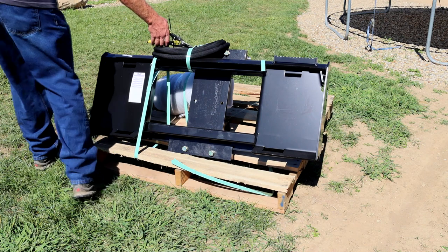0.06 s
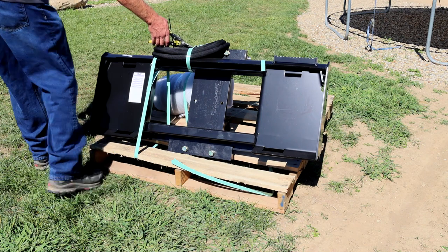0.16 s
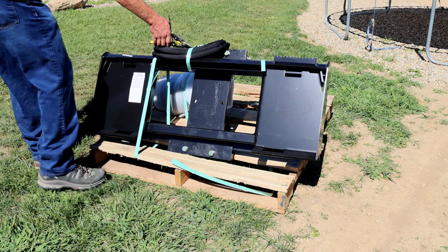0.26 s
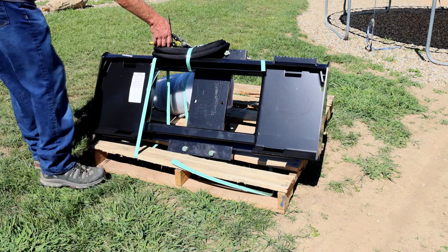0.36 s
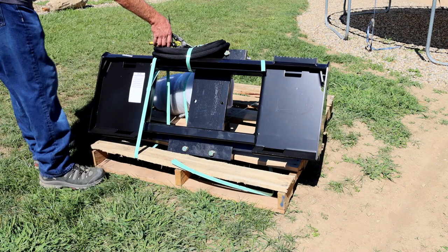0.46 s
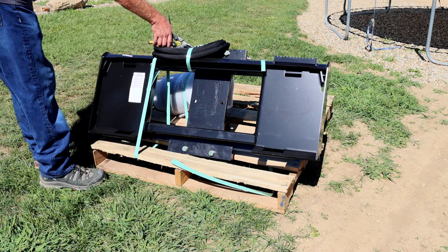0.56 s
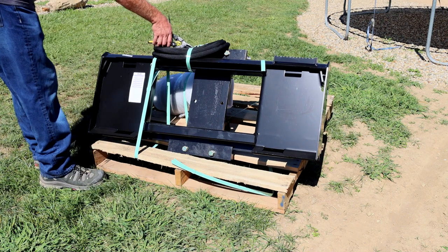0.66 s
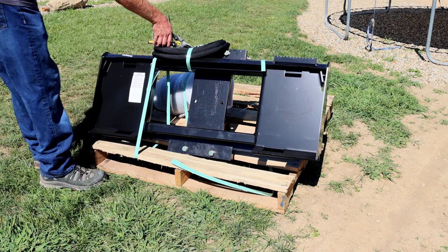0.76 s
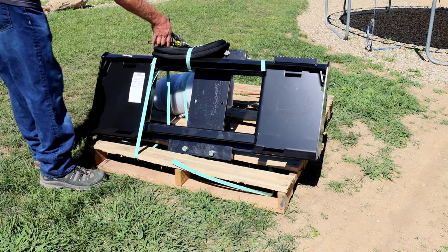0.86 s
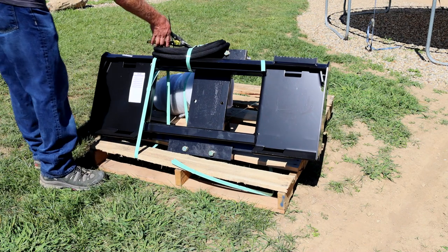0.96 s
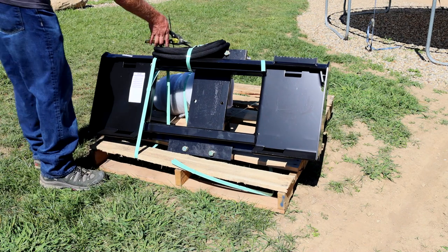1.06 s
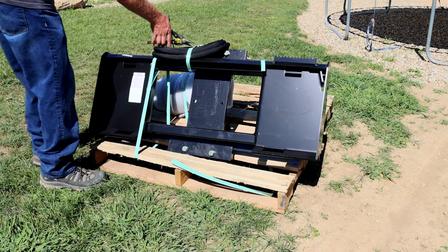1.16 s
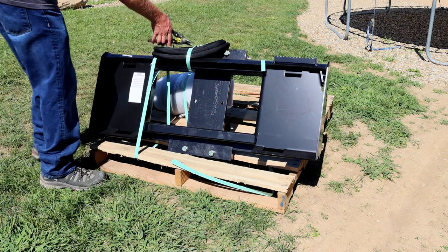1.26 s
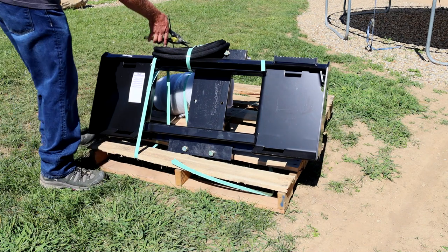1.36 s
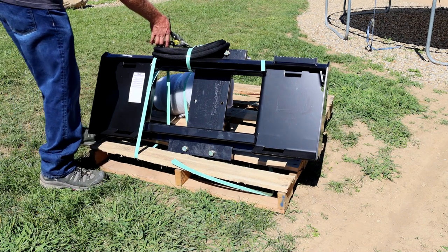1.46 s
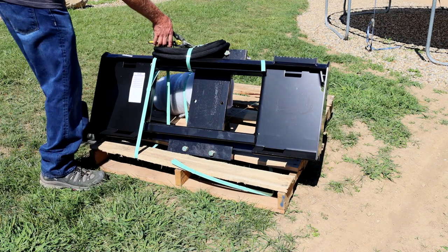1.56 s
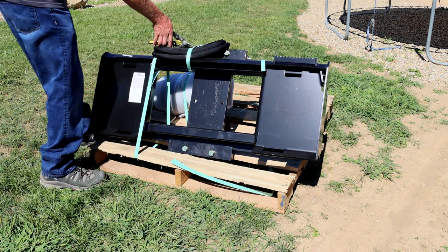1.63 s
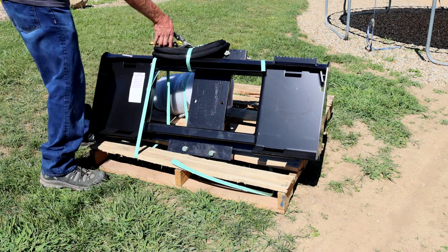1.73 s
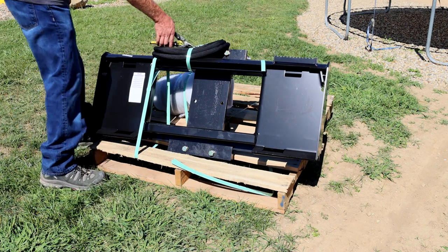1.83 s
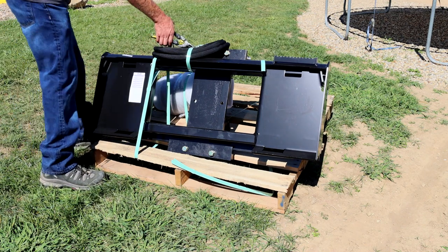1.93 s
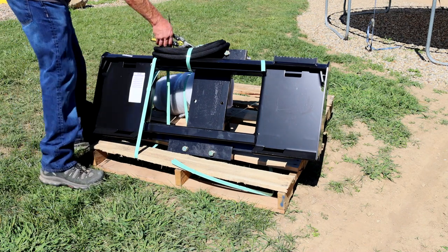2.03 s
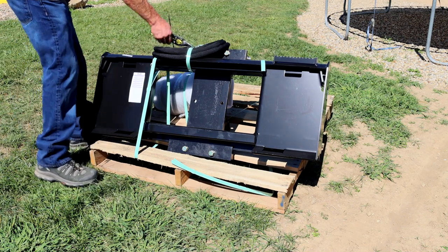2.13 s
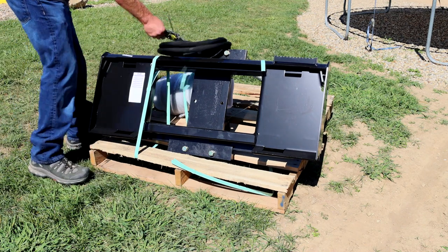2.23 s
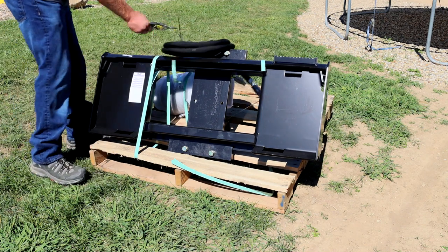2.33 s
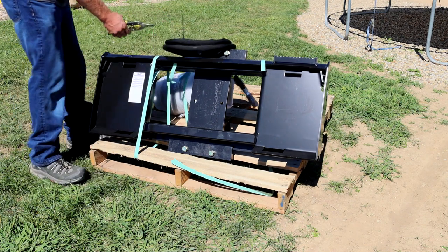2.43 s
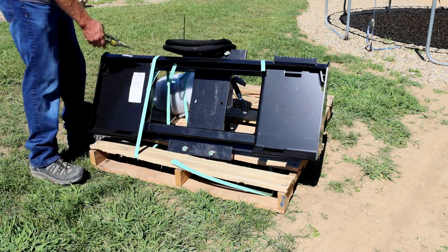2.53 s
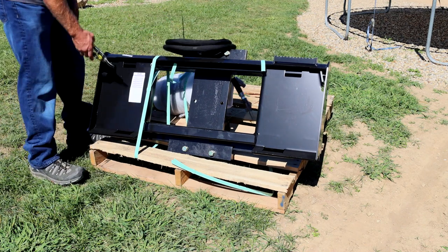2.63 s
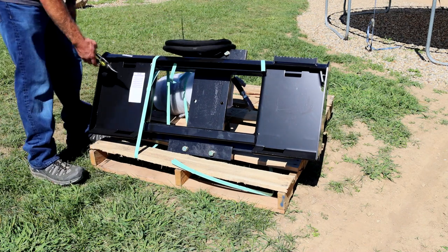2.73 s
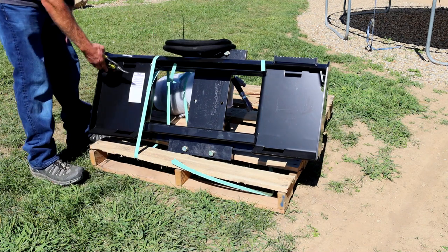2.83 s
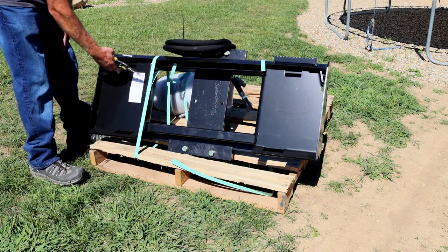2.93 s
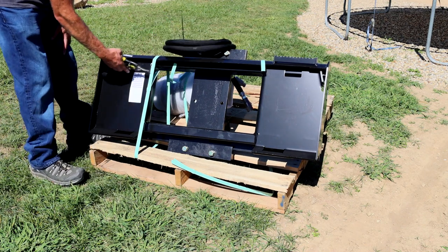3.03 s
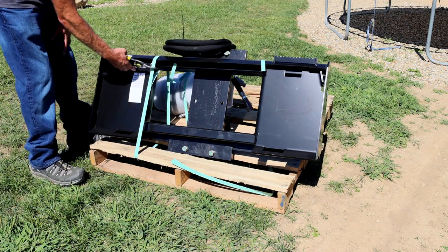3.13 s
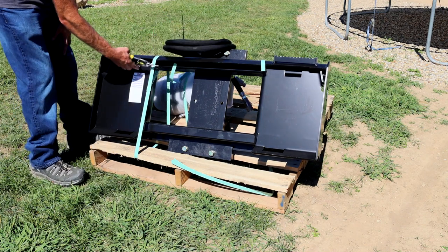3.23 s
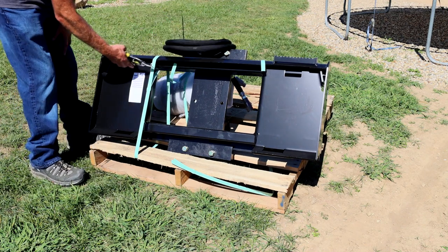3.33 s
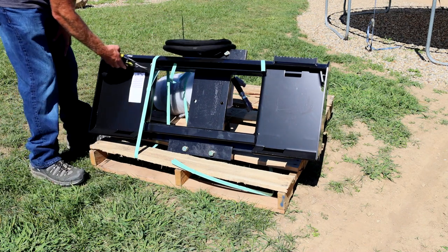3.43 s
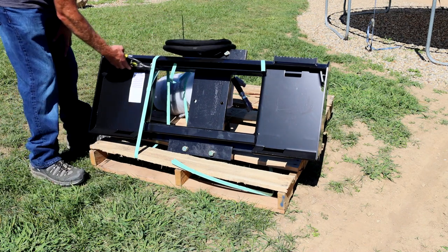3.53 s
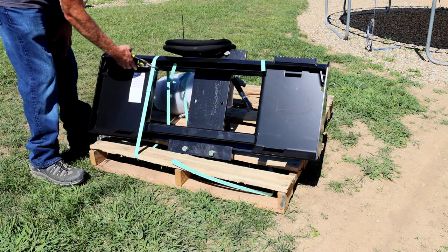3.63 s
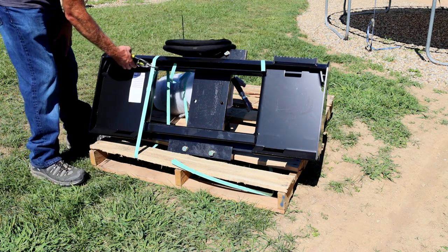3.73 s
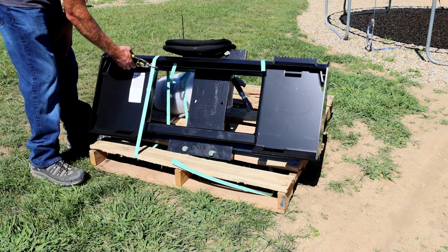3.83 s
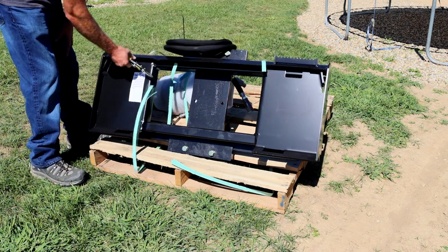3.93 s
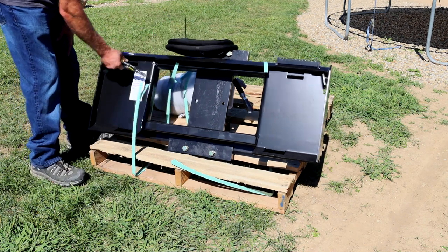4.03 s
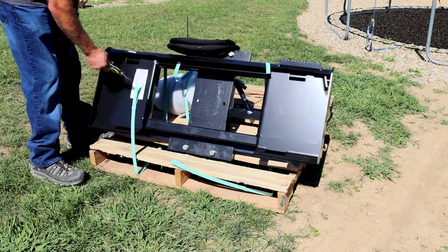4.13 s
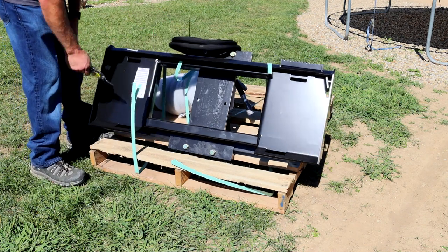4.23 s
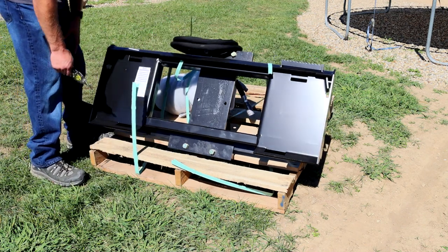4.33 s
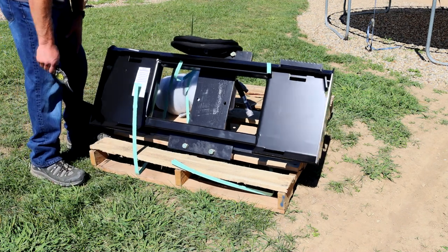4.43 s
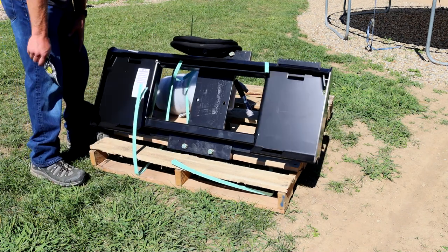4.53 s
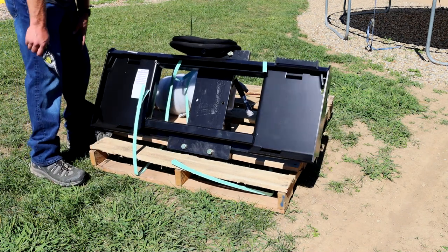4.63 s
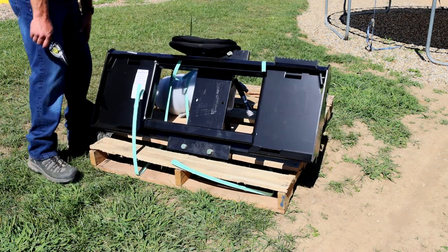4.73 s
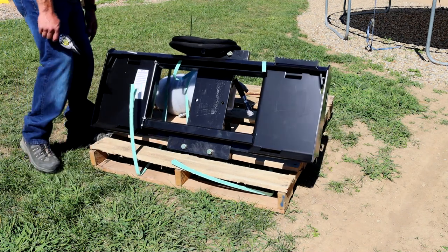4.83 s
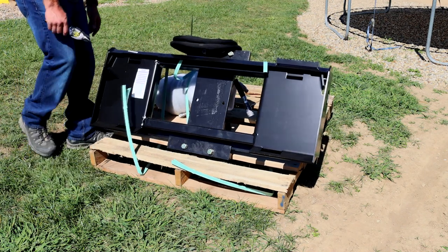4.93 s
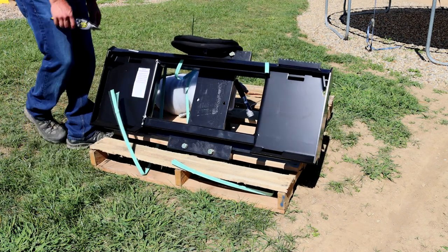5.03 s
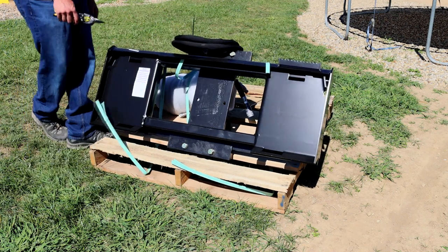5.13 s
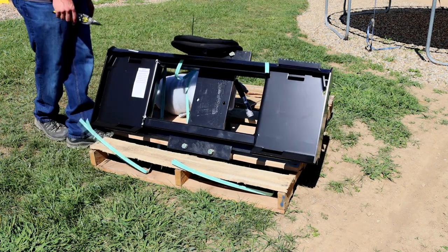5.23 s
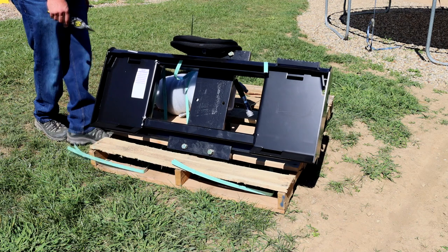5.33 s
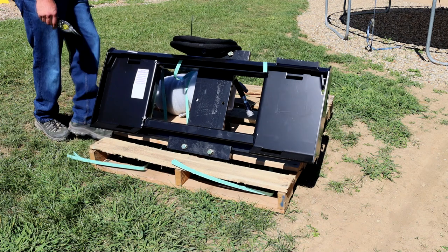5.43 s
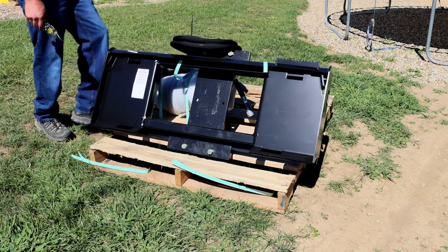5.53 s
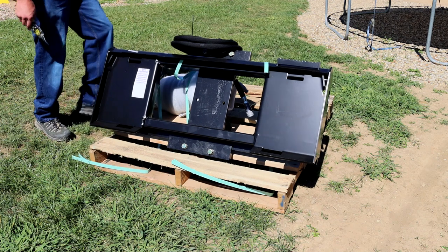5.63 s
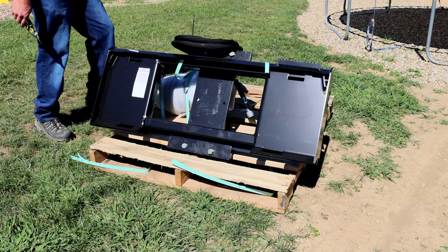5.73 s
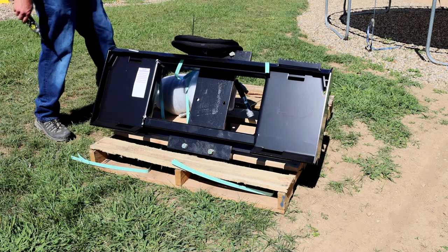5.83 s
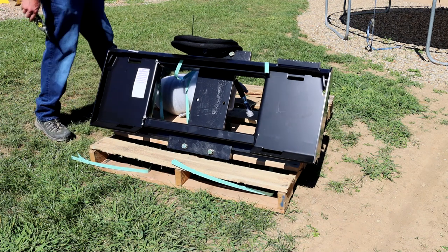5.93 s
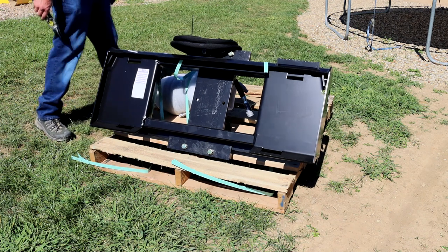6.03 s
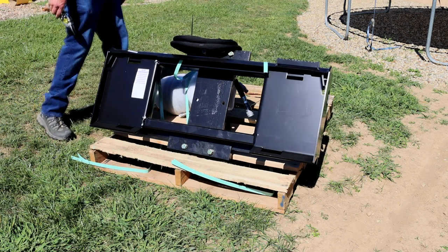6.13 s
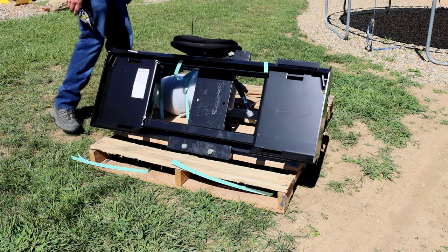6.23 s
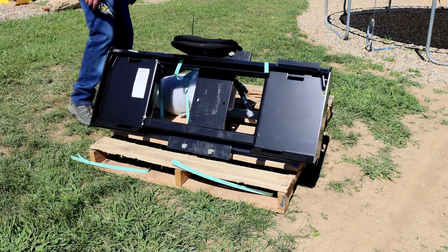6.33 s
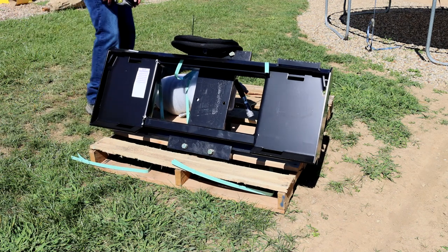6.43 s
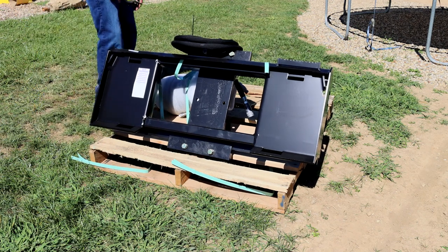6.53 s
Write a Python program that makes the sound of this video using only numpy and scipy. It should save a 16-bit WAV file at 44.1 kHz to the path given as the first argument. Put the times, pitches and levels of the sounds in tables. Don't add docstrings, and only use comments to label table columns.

```python
import sys
import numpy as np
from scipy import signal
from scipy.io import wavfile

SR = 44100
rng = np.random.default_rng(int(sys.argv[2]) if len(sys.argv) > 2 else 0)


def bounce(signal):
    frames = np.transpose(np.atleast_2d(signal))
    limited = np.clip(frames, -1, 1)
    pcm = np.round(limited * 32767).astype(np.int16)
    wavfile.write(sys.argv[1], SR, pcm)


def gain_from_decibels(decibels):
    exponent = np.asarray(decibels, float) / 20
    return 10 ** exponent


N = 289737

# [f/Hz, level per Hz/dB]
AIR_COLOUR = [(20, -29), (45, -6.5), (150, -9), (600, -13.5), (2300, -19), (5500, -22.5), (10000, -44),
              (16000, -14.5)]
# [loudest t/s, scrape level/dB, rustle re scrape/dB,
# time to rise 20 dB/s, time to fall 20 dB/s]
DRAG_STROKES = [(0.12, -48, -3, .55, .55), (1.135, -48, -18, .16, .11), (1.69, -55.5, -15, .3, .5),
                (2.146, -57, 13, .012, .4), (2.28, -46, 6, .06, .07), (2.35, -39, -16, .17, .12),
                (2.41, -43, 9, .04, .11), (2.516, -33.5, -9, .2, .065), (2.59, -50, -26, .06, .33),
                (3.97, -52, 3, .012, .6), (4.108, -39.5, -9, .28, .36), (4.95, -58.5, -7, 2.5, .6),
                (5.38, -53.5, -6, .8, .6), (6.43, -57, -14, .5, .8)]
# [t/s, peak level/dB, body f/Hz, crack re peak/dB]
TOOL_TAPS = [(0.018, -31, 1160, -33), (0.039, -37, 1340, -15), (0.075, -37, 1400, -18),
             (0.177, -35, 1330, -9), (0.279, -39, 1070, -18), (1.136, -31, 1400, -24),
             (1.256, -28.5, 1200, -36), (1.568, -30, 1150, -22), (1.580, -28.5, 1120, -21),
             (2.049, -38, 1470, 1), (2.936, -20, 1560, -14), (3.1615, -29, 1800, -24),
             (3.166, -38, 870, -40), (3.236, -40, 2100, -8), (3.652, -25, 1570, -24),
             (3.672, -21, 2010, -15), (3.693, -15.5, 1330, -19), (3.712, -14.5, 2080, -19),
             (3.733, -22.5, 2080, -18), (3.769, -28.5, 1240, -27), (5.344, -36.5, 1490, 1)]
# [t/s, peak level/dB, body f/Hz, thud re peak/dB]
PALLET_KNOCKS = [(0.143, -32, 832, -15), (0.152, -35.5, 2030, -13), (1.03, -36.5, 1540, -25),
                 (1.621, -31.5, 1130, -20), (1.669, -40, 1300, -5), (2.638, -28, 1150, -16),
                 (2.722, -35.5, 802, -1), (2.797, -24.5, 1380, -14.5), (2.845, -34.5, 1080, 3),
                 (3.009, -37.5, 1350, -11), (4.334, -33.5, 1220, -14), (4.454, -25.5, 810, 8),
                 (4.466, -27, 802, 13), (4.511, -33, 1840, -16), (4.549, -27.5, 1230, -18),
                 (4.616, -37, 900, -18), (4.68, -41, 830, -18), (4.882, -41, 816, -10),
                 (5.205, -40, 1280, -12), (5.399, -41, 1510, -12), (5.487, -27, 800, -16),
                 (6.537, -23, 1130, 10), (6.554, -26, 1140, 9)]
# [t/s, peak level/dB, body f/Hz, crack re peak/dB]
FAINT_TICKS = [(1.058, -44, 2000, -30), (2.285, -20, 900, -35), (4.334, -38, 2500, -8),
               (4.778, -43, 1500, -14), (4.83, -46, 1400, -25), (5.075, -47, 800, -25),
               (5.25, -46, 520, -30), (5.29, -44, 800, -14), (5.325, -43, 700, -30), (5.41, -43, 520, -30),
               (5.452, -40, 750, -20), (5.611, -43, 760, -25), (6.224, -38, 1820, -12),
               (6.43, -44, 510, -30)]
# [t/s, peak level/dB, body f/Hz, crack re peak/dB]
FIRST_STRAP_SLAPS = [(2.1445, -25, 1900, -4), (2.1515, -22, 1800, -10.5), (2.1722, -3, 1830, -2),
                     (2.2, -21, 520, -9), (2.22, -19.5, 1780, -13), (2.238, 2, 1100, 1),
                     (2.2418, 2.5, 1950, 0), (2.247, -8, 1880, -17.5), (2.275, -14, 2530, -9.5),
                     (2.289, -16, 1200, -32), (2.298, -14, 800, -22), (2.306, -18, 1000, -22),
                     (2.362, -1, 1800, -5), (2.368, -7, 2300, -12), (2.38, -9.5, 2470, -9),
                     (2.393, -12.5, 1680, -10), (2.409, -13, 1350, 0), (2.419, -23, 1350, -10),
                     (2.45, -6, 1210, 2)]
# [t/s, peak level/dB, body f/Hz, crack re peak/dB]
BOARD_LANDINGS = [
    (2.484, -19.5, 802, -22.5),
    (2.488, 0.5, 1250, 7),
    (2.499, -8.5, 800, -0.5),
    (2.506, -12, 2540, -12),
    (2.512, -19, 821, 0),
    (2.523, -17.5, 802, -17),
    (2.538, -27, 895, -19),
    (3.9645, 5.5, 1650, -6),
    (3.969, -5.5, 776, -13),
    (3.978, -8, 826, -14),
]
# [t/s, peak level/dB, body f/Hz, crack re peak/dB]
SECOND_STRAP_SLAPS = [(3.988, -17, 872, -20), (4.004, -11, 1420, -9), (4.009, -17.5, 1130, -13),
                      (4.039, -18, 3200, -9), (4.05, -11.5, 1560, -19), (4.063, -14, 1900, -22),
                      (4.074, -28, 800, -15), (4.083, -18, 2600, -11.5), (4.101, -21, 2000, -6),
                      (4.114, -22.5, 3000, -12), (4.141, -20, 1250, -17), (4.165, -25.5, 1110, -10),
                      (4.176, -28, 802, -16), (4.248, -24, 2600, -12), (4.261, -27.5, 1230, -16)]
# [f/Hz, width/Hz, level/dB]
TAP_EDGE = [(3770, 2070, 2.5), (5560, 1350, -4.5), (7600, 1100, -5.5)]
# [f/Hz, width/Hz, level/dB]
SNAP_EDGE = [(4500, 2500, 2.5), (8160, 1100, 12), (14000, 3500, -9)]
# [t/s, peak level/dB]
TIP_FLICKS = [(0.1431, -41), (0.5402, -38), (2.0502, -33), (2.1725, -17), (2.2383, -12), (2.2424, -15),
              (2.364, -19), (2.3924, -27), (2.4104, -28), (2.4487, -1.5), (2.4887, -14), (2.4984, -23),
              (2.5054, -27), (2.5124, -33), (3.692, -38), (3.712, -40), (3.9654, -21), (3.978, -26),
              (4.0053, -13), (4.0084, -17), (4.0392, -30), (4.0514, -29.5), (4.0734, -40), (4.0836, -34.5),
              (4.1016, -34), (4.1154, -39), (4.147, -35), (4.2507, -38)]
# [f/Hz, level/dB, time to fall 60 dB/s]
CUTTER_MODES = [(894, 0, .13), (969, -13, .2), (1190, -14, .5), (1351, -10, .55), (1480, -13, .15),
                (1740, 5, .05), (2024, -8, .2), (2120, 5, .03), (2288, -8, .3), (2800, -2, .03),
                (3750, -7, .035)]
# [t/s, level/dB]
CUTTER_HITS = [
    (1.0735, -58),
    (1.1375, -46),
    (1.2575, -56),
    (3.1638, -36),
    (3.171, -43),
    (3.237, -51),
]
# [f/Hz, level/dB, time to fall 60 dB/s]
PLATE_MODES = [(818, 3, .19), (1240, -3, .08), (1010, -9, .07), (1530, -8, .07)]
# [t/s, level/dB]
PLATE_PATS = [(3.97, -32), (4.29, -47), (4.551, -46), (4.617, -46), (4.682, -47), (4.755, -53),
              (4.826, -49), (4.884, -51), (4.94, -53), (4.985, -53), (5.015, -54)]
# [start t/s, end t/s, last slips per s, last level/dB, swell/dB]
JAW_CREAKS = [
    (1.0755, 1.136, 295, -27, 3),
    (3.902, 3.965, 450, -28, 11),
]
# [f/Hz, width/Hz, level/dB]
JAW_RINGS = [
    [(740, 130, -6), (980, 270, -5), (1450, 300, -4), (1960, 120, 4.5), (4660, 1450, -15.5),
     (7700, 1300, -19.5)],
    [(1400, 500, -7.5), (2100, 500, -1), (2900, 700, -6), (4100, 1500, -7), (8500, 2600, -14),
     (13060, 5000, -20)],
]
# [f/Hz, level/dB, time to fall 60 dB/s]
FRAME_MODES = [(229, -14, .7), (544, -14.5, 1.3), (685, -13.5, 1.6), (728, -0.5, 0.22), (758, -7, 0.85),
               (1421, -19, .8), (1130, -13, 0.58), (1229, -15.5, 1.29), (1343, -13.5, 0.36), (1502, -9, .3),
               (1590, -18, 0.38), (2395, -24, .5), (3410, -25, 0.6)]
# [f/Hz, level/dB, time to fall 60 dB/s]
PANEL_MODES = [(862, -5, 0.17), (1223, -9.5, 0.7), (1365, -0.5, .4), (1720, -5, .2), (2030, -11, 0.27),
               (2300, -13, 0.35), (3800, -16.5, 0.28)]
# [t/s, frame level/dB, panel level/dB]
STEEL_BLOWS = [(1.137, -62, -49), (1.57, -58, -56), (2.173, -35, -40.5), (2.24, -26.5, -29),
               (2.3, -43, -45), (2.365, -42, -28.5), (2.49, -37.5, -50), (3.164, -74, -52),
               (3.652, -43, -31), (3.714, -43, -35.5), (3.966, -18.5, -32), (4.052, -34.5, -38),
               (4.143, -37.5, -66), (4.55, -47, -57), (5.472, -43, -48.5)]
# [t/s, f/Hz,
# level/dB, time to fall 60 dB/s]
TWANG_NOTES = [(1.6225, 1050, -35, .06), (2.1735, 950, -26, .04), (2.1735, 1950, -22, .04),
               (2.21, 400, -29, .1), (2.2395, 980, -12, .045), (2.2398, 1950, -11, .06),
               (2.31, 544, -29, .5), (2.364, 1800, -14, .05), (2.364, 560, -21, .07), (2.49, 420, -22, .1),
               (3.9665, 1480, -15, .07), (3.9665, 4300, -15, .03), (4.2515, 3200, -32, .05),
               (5.478, 830, -36, .25), (5.478, 715, -36, .25)]
# [t/s, length/s, start f/Hz, end f/Hz, level/dB]
WHISTLES = [
    (1.684, .05, 4500, 3200, -54.5),
    (5.07, .06, 4750, 3400, -54),
    (5.688, 0.0089, 10100, 8500, -47),
    (5.705, .008, 10100, 8800, -50),
    (6.18, .03, 6750, 6750, -47),
    (6.264, .008, 9500, 8400, -51),
]
# [t/s, peak level/dB, f/Hz, time
# to fall 60 dB/s]
LOW_THUMPS = [(2.286, -29, 135, 0.13), (2.509, -30, 177, 0.12), (2.599, -36, 131, 0.15),
              (2.869, -42, 164, 0.08), (3.745, -36, 205, 0.086), (3.963, -10.5, 270, 0.08),
              (4.139, -27, 170, 0.08), (4.169, -28, 247, 0.099), (4.45, -24, 285, 0.1),
              (4.51, -38, 110, 0.089), (4.599, -36, 172, 0.13), (4.72, -42, 230, .2),
              (5.207, -32.5, 150, 0.066), (6.549, -38, 320, 0.08)]
# [t/s, level/dB]
RASP_LEVEL = [
    (3.637, -52),
    (3.6385, -26),
    (3.65, -23.5),
    (3.724, -21),
    (3.734, -31),
    (3.83, -51.5),
]
# [f/Hz, width/Hz, level/dB]
RASP_RINGS = [(552, 86, -3.5), (735, 50, -8.5), (1027, 60, -5), (1350, 51, -2.5), (1560, 70, 1),
              (2080, 94, -1), (2760, 200, -9), (3820, 140, -9), (5860, 200, -18)]
# [f/Hz, width/Hz, level/dB]
SLAT_RINGS = [(770, 40, 1), (520, 220, -1), (1080, 250, 4), (1540, 250, 4), (2300, 400, 3), (2900, 400, 1),
              (3700, 700, 1), (5300, 1200, -2)]


def rms_one(x):
    return x / np.sqrt(np.mean(x ** 2) + 1e-20)


def peak_one(x):
    return x / np.max(np.abs(x))


def drift(rate):
    r = np.exp(-80 * np.pi * rate / SR)
    slow = signal.lfilter([1], [1, -2 * r, r * r], rng.standard_normal(N // 40 + 2002))[2000:]
    return np.interp(np.arange(N) / 40, np.arange(len(slow)), rms_one(slow - slow.mean()))


def resonance(x, hz, width_hz):
    r = np.exp(-np.pi * width_hz / SR)
    poles = [1, -2 * r * np.cos(2 * np.pi * hz / SR), r * r]
    return signal.lfilter([(1 - r * r) / 2, 0, (r * r - 1) / 2], poles, x)


def body(x, peaks):
    return sum((-1) ** k * gain_from_decibels(db) * resonance(x, hz, width) for k, (hz, width, db) in enumerate(peaks))


def band(x, low_hz, high_hz):
    return signal.sosfilt(signal.butter(2, [low_hz, high_hz], "band", fs=SR, output="sos"), x)


def low_pass(x, hz):
    return signal.sosfilt(signal.ellip(10, .3, 60, hz, fs=SR, output="sos"), x)


def grains(per_s, spread_db):
    sizes = gain_from_decibels(spread_db * np.minimum(rng.exponential(1, N), 4)) * rng.choice([-1, 1], N)
    return sizes * (rng.random(N) < per_s / SR)


def ring(clicks, hz, t60):
    r, w = gain_from_decibels(-60 / (t60 * SR)), 2 * np.pi * hz / SR
    return signal.lfilter([0, np.sin(w)], [1, -2 * r * np.cos(w), r * r], clicks)


def air(patchy_db):
    murmur, edges = 0, 22 * 2 ** np.arange(0, 10, .5)
    white = rng.standard_normal((2, N))
    colour_hz, colour_db = np.transpose(AIR_COLOUR)
    for k, (low, high) in enumerate(zip(edges, edges[1:])):
        level_db = np.interp(np.log(low * high) / 2, np.log(colour_hz), colour_db)
        flicker_db = patchy_db * drift(4) * (high < 4000)
        murmur = murmur + gain_from_decibels(level_db + flicker_db) * band(white[k % 2], low, high)
    hum_hz = 121.1
    hum = resonance(resonance(rng.standard_normal(N), hum_hz, 22), hum_hz, 22)
    return gain_from_decibels(-55.5) * rms_one(murmur) + gain_from_decibels(-62.5) * rms_one(hum)


def insects():
    cicada_hz, half_width_hz, cricket_hz = 7523, 520, 4880
    chorus = rng.standard_normal(N) * gain_from_decibels(0.85 * drift(150) + drift(1.7) / 2)
    cicadas = band(chorus, cicada_hz - half_width_hz, cicada_hz + half_width_hz)
    cicadas += 0.21 * resonance(chorus, cicada_hz, 2200)
    trill = rng.standard_normal(N) * gain_from_decibels(3.2 * drift(7.9) + 1.5 * drift(40))
    crickets = resonance(resonance(trill, cricket_hz, 560), cricket_hz, 560)
    return gain_from_decibels(-48) * rms_one(cicadas) + gain_from_decibels(-62) * rms_one(crickets)


def drag():
    t = np.arange(N) / SR
    dull, bright = np.zeros((2, N))
    for s, scrape_db, rustle_db, rise, fall in DRAG_STROKES:
        stroke = gain_from_decibels(scrape_db - 20 * np.maximum((s - t) / rise, (t - s) / fall))
        dull = np.hypot(dull, stroke)
        bright = np.hypot(bright, gain_from_decibels(rustle_db) * stroke)
    scrape_peaks = [(342, 300, 4), (750, 550, 4), (1300, 630, 3), (2100, 790, -3)]   # f, width, dB
    rustle_peaks = [(3300, 3000, 0), (8060, 3000, -6), (13500, 5000, -8)]
    scrape = rms_one(body(grains(2500, 1.7), scrape_peaks))
    rustle = rms_one(body(grains(2200, 4.0), rustle_peaks))
    return dull * gain_from_decibels(2.9 * drift(40)) * scrape + bright * gain_from_decibels(1.9 * drift(60)) * rustle


def strap_rows(table, thud_db, follows, t60):
    return [(s, db, hz, thud_db - (1 - follows) * db, crack_db, t60 * (hz / 1000) ** .6)
            for s, db, hz, crack_db in table]


def slaps(table, edge, thud_hz, thud_slower, crack_faster, width_share, spike, broad, click):
    out, t = np.zeros(N + 8192), np.arange(8192) / SR
    for s, peak_db, hz, thud_db, crack_db, t60 in table:
        noise = rng.standard_normal((3, len(t)))
        fall_db = -60 * t / np.clip(t60, .004, .2)
        jolt = spike * np.exp(-t / 0.00042)
        crack_fall = gain_from_decibels(fall_db * crack_faster) + .3 * gain_from_decibels(fall_db) + jolt
        crack = band(body(noise[0] * crack_fall, edge), 2700, 16800)
        burst = noise[1] * (gain_from_decibels(fall_db) + jolt) + click * (t == 0)
        narrow = resonance(resonance(burst, hz, width_share * hz), hz, hz)
        strap = narrow + broad * band(burst, 0.46 * hz, 2.64 * hz)
        push = noise[2] * gain_from_decibels(fall_db / thud_slower) * np.minimum(t / 0.0017, 1)
        thud = band(push, thud_hz, 798)
        mix = peak_one(strap) + gain_from_decibels(crack_db + 10.5) * peak_one(crack) + gain_from_decibels(thud_db + 8.5) * peak_one(thud)
        at = round((s + 0.001307) * SR)
        out[at:at + len(t)] += gain_from_decibels(peak_db) * peak_one(mix)
    return out[:N]


def flicks():
    out, t = np.zeros(N), np.arange(2048) / SR
    for s, peak_db in TIP_FLICKS:
        fall = gain_from_decibels(-60 * t / 0.0087) + .2 * gain_from_decibels(-60 * t / .03)
        hiss = band(rng.standard_normal(len(t)) * fall, 12000, 17000)
        at = round((s + 0.0014) * SR)
        out[at:at + len(t)] += gain_from_decibels(peak_db - 1.2) * peak_one(hiss)
    return out


def struck(knocks, modes, spread_db):
    s, db = np.transpose(knocks)
    out = np.zeros(N)
    for hz, level_db, t60 in modes:
        clicks = np.full(N, 1e-18)
        clicks[np.round(s * SR).astype(int)] = gain_from_decibels(db + level_db + spread_db * rng.standard_normal(len(s)))
        flutter = gain_from_decibels(2.2 * drift(25))
        out += flutter * ring(clicks, hz, t60)
    return band(out, 600, 6000)


def creaks():
    out = np.zeros(N)
    first_rate = 185
    for (start, end, last_rate, last_db, swell), jaw in zip(JAW_CREAKS, JAW_RINGS):
        share = np.linspace(0, 1, round((end - start) * SR))
        turns = np.cumsum(first_rate * (last_rate / first_rate) ** share) / SR
        at = np.flatnonzero(np.diff(np.floor(turns)))
        jitter = rng.standard_normal((64, 2))[:len(at)]
        swell_db = last_db - swell * (1 - share[at] ** 0.55) + 1.2 * jitter[:, 1]
        slips = np.full(8192, 1e-18)
        slips[at + (7.0 * share[at] * jitter[:, 0]).astype(int)] = gain_from_decibels(swell_db)
        scratch = signal.lfilter([1], [1, -.985], slips) * rng.standard_normal(len(slips))
        push = slips + .2 * scratch
        rung = sum(gain_from_decibels(db) * resonance(resonance(push, hz, w), hz, 3.2 * w) for hz, w, db in jaw)
        first = round(start * SR)
        out[first:first + len(slips)] = gain_from_decibels(29) * rung
    return out


def steel():
    blows, out = np.array(STEEL_BLOWS), np.zeros(N)
    at = [round(s * SR) for s in blows[:, 0]]
    for blow_db, modes in ((blows[:, 1], FRAME_MODES), (blows[:, 2], PANEL_MODES)):
        for hz, level_db, t60 in modes:
            clicks = np.full(N, 1e-18)
            strength = gain_from_decibels(blow_db + level_db + rng.normal(0, 1.5, len(at)))
            clicks[at] = strength * rng.choice([-1, 1], len(at))
            waver = gain_from_decibels(1.2 * drift(6))
            out += waver * ring(clicks, hz, t60)
    return band(out, 190, 6000)


def twangs():
    out, t = np.zeros(N), np.arange(16384) / SR
    for s, hz, db, t60 in TWANG_NOTES:
        level = gain_from_decibels(db - 60 * t / t60) * np.minimum(t / .0006, 1)
        at = round(s * SR)
        out[at:at + len(t)] += level * np.sin(2 * np.pi * hz * t)
    return out


def bird():
    out = np.zeros(N)
    for s, length, start_hz, end_hz, db in WHISTLES:
        share = np.linspace(0, 1, round(length * SR))
        tone = np.sin(2 * np.pi * np.cumsum(start_hz + (end_hz - start_hz) * share) / SR)
        at = round(s * SR)
        out[at:at + len(share)] = gain_from_decibels(db) * np.sin(np.pi * share) * tone
    return out


def boots():
    out, t = np.zeros(N + 8192), np.arange(8192) / SR
    for s, peak_db, hz, t60 in LOW_THUMPS:
        puff = rng.standard_normal(len(t)) * np.minimum(t / .006, 1) * gain_from_decibels(-60 * t / t60)
        thump = band(resonance(puff, hz, hz), 0.66 * hz, 1.6 * hz)
        at = round(s * SR)
        out[at:at + len(t)] += gain_from_decibels(peak_db - 2.5) * peak_one(thump)
    return out[:N]


def rasp():
    t = np.arange(N) / SR
    s, level_db = np.transpose(RASP_LEVEL)
    tooth_dip_db = 8 * ((t - 3.6505) / .0205 % 1)
    stroke_db = np.interp(t, s, level_db, left=-120, right=-120)
    level = gain_from_decibels(stroke_db + 1.5 * drift(53) - tooth_dip_db)
    rung = body(grains(1800, 1.7), RASP_RINGS)
    return level * rms_one(band(band(rung, 440, 9000), 410, 12000))


def clack():
    t = np.arange(16384) / SR
    late = t - .0007
    fall = np.exp(-t / .0035) + .06 * np.exp(-t / .02)
    knock = (late > 0) * np.exp(-np.abs(late) / .00012) + .22 * rng.standard_normal(len(t)) * fall
    lag, dull, back = round(.00135 * SR), .5, .66
    feedback = np.r_[1, -dull, np.zeros(lag - 2), -back * (1 - dull)]
    bounced = signal.lfilter([1, -dull], feedback, knock)
    wood = sum(gain_from_decibels(db) * resonance(bounced, hz, width) for hz, width, db in SLAT_RINGS)
    tick = band(rng.standard_normal(len(t)) * np.exp(-t / 0.00086), 4000, 14000)
    out, at = np.zeros(N), round(5.4713 * SR)
    out[at:at + len(t)] = gain_from_decibels(-2) * (peak_one(band(wood, 350, 6600)) + .15 * peak_one(tick))
    return out


def scene():
    whips = strap_rows(FIRST_STRAP_SLAPS, thud_db=-37, follows=.1, t60=.037)
    whips += strap_rows(BOARD_LANDINGS, thud_db=-18, follows=.7, t60=.031)
    whips += strap_rows(SECOND_STRAP_SLAPS, thud_db=-34, follows=.3, t60=.036)
    taps = strap_rows(TOOL_TAPS, thud_db=-32, follows=.8, t60=.042)
    # one crack setting of -25 dB for all, 60 dB fall in 50 ms
    taps += [(s, db, hz, thud_db, -25, .05) for s, db, hz, thud_db in PALLET_KNOCKS]
    ticks = strap_rows(FAINT_TICKS, thud_db=-25, follows=.9, t60=.04)
    near = slaps(whips, SNAP_EDGE, thud_hz=185, thud_slower=2.3, crack_faster=2.66,
                 width_share=0.14, spike=1.2, broad=.31, click=2.5)
    near += slaps(taps, TAP_EDGE, thud_hz=177, thud_slower=2.17, crack_faster=3.8,
                  width_share=.25, spike=0.93, broad=.17, click=2.5)
    near += slaps(ticks, TAP_EDGE, thud_hz=200, thud_slower=1.5, crack_faster=3.5,
                  width_share=.2, spike=.9, broad=.2, click=3.0)
    near += flicks() + creaks() + rasp() + steel() + clack() + twangs()
    near += struck(CUTTER_HITS, CUTTER_MODES, spread_db=1.5)
    near += struck(PLATE_PATS, PLATE_MODES, spread_db=2.5)
    quiet = air(patchy_db=1.9) + insects() + drag() + bird() + boots()
    return (near + low_pass(quiet, 15850))[None]


def top_cut(x):
    return signal.sosfilt(signal.butter(12, 16520, fs=SR, output="sos"), x)


def record(dry):
    overloaded = np.clip(dry, -.82, .82)
    mix = low_pass(overloaded, 16400)
    return top_cut(mix)


dry = scene()
out = record(dry)
bounce(out)
```